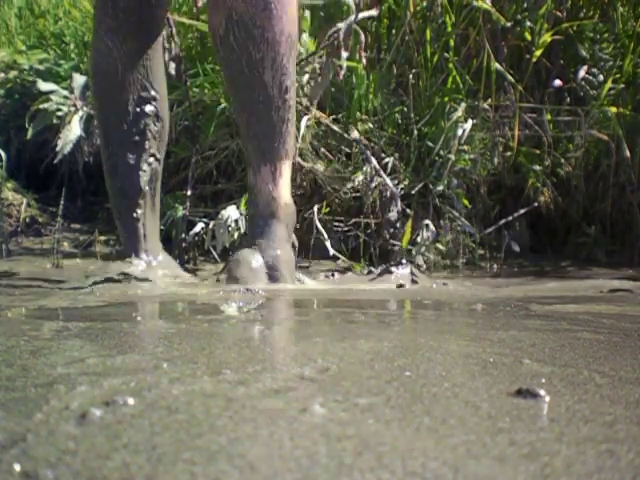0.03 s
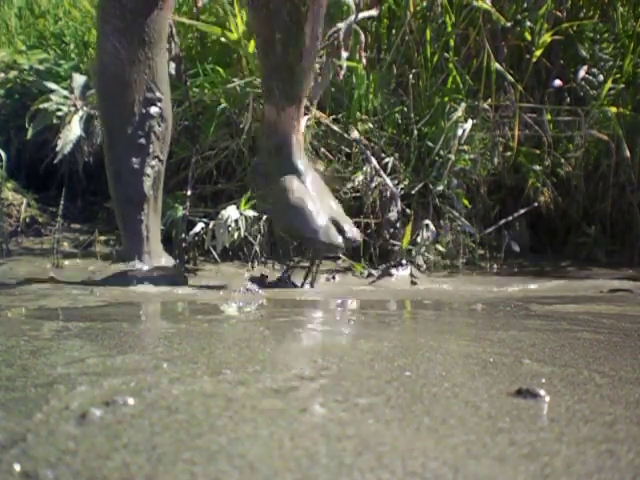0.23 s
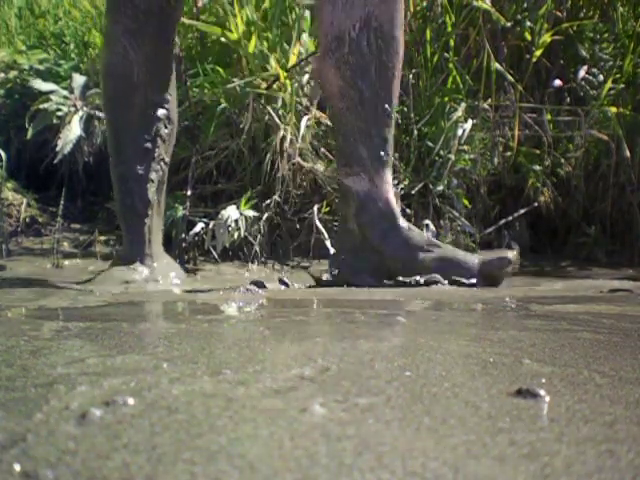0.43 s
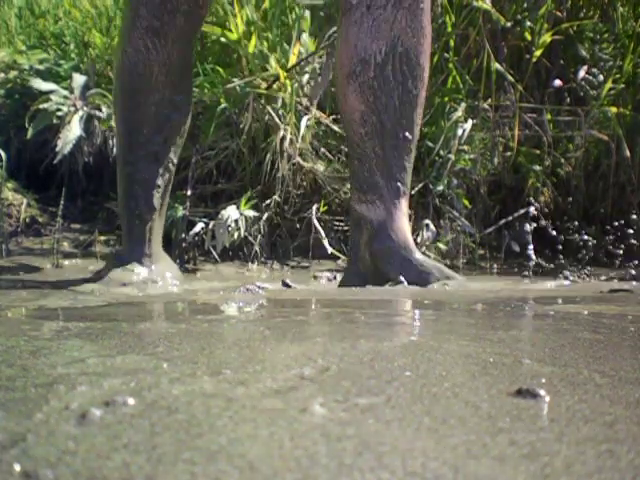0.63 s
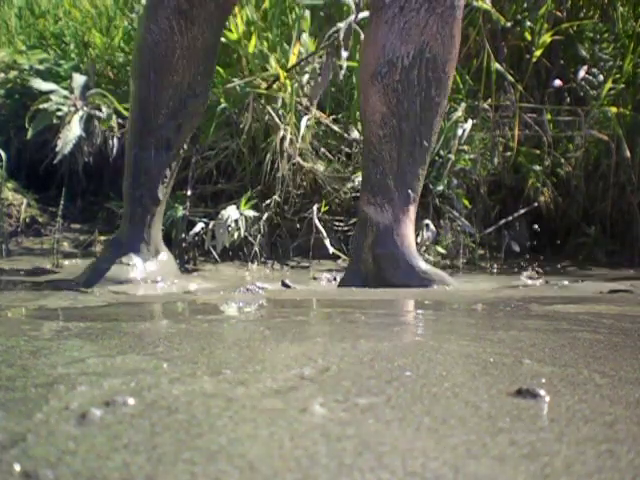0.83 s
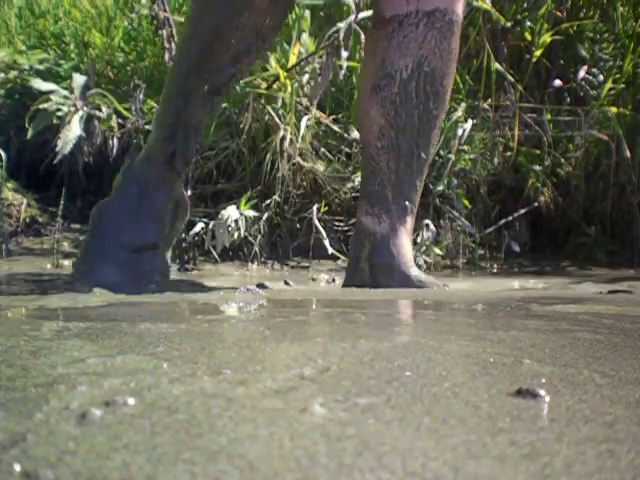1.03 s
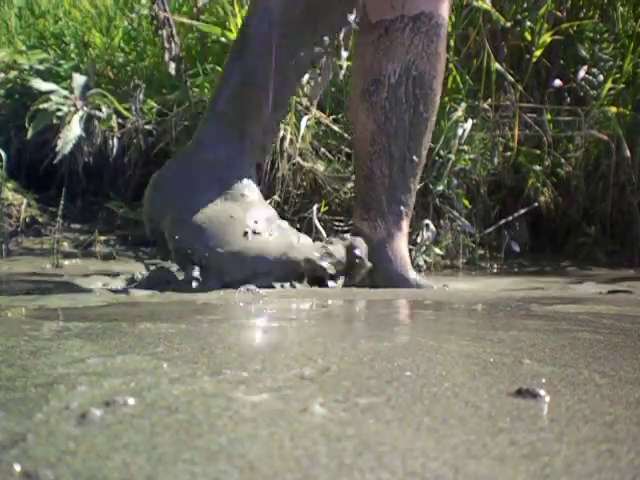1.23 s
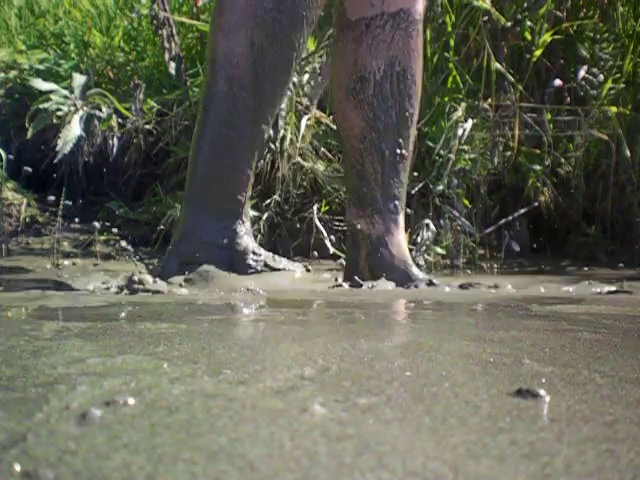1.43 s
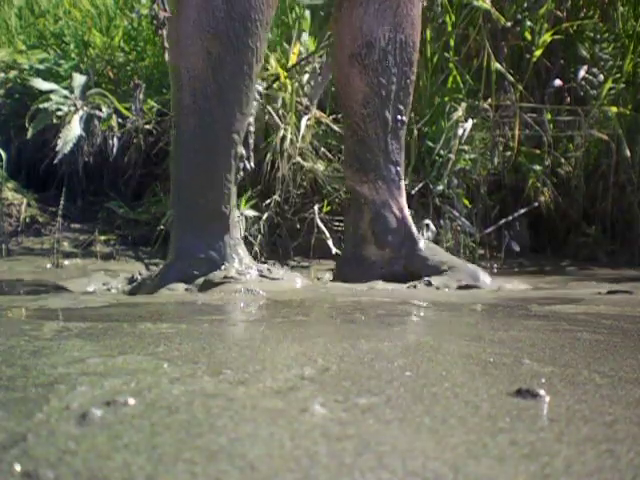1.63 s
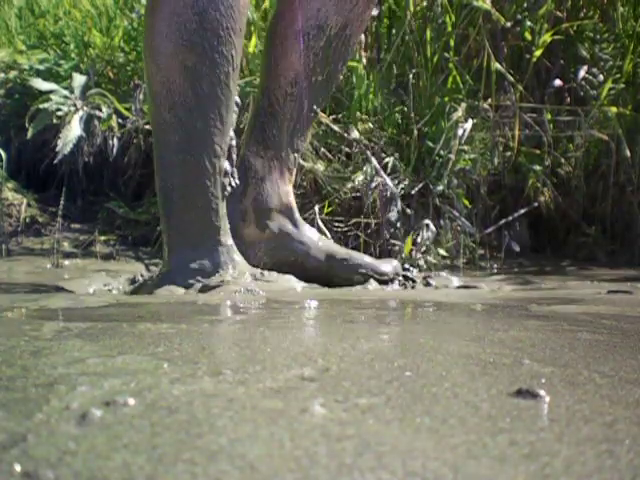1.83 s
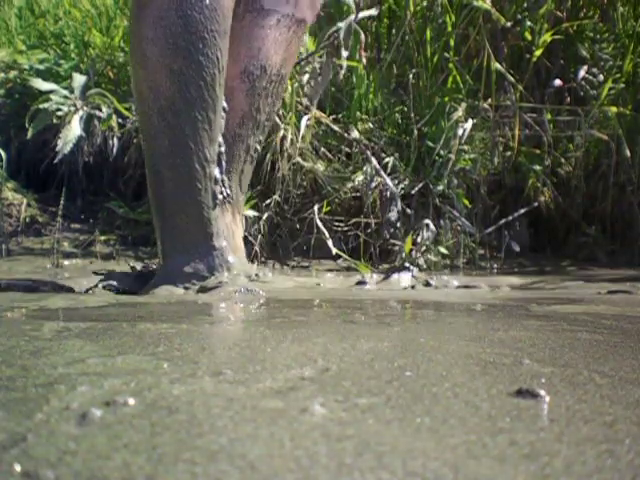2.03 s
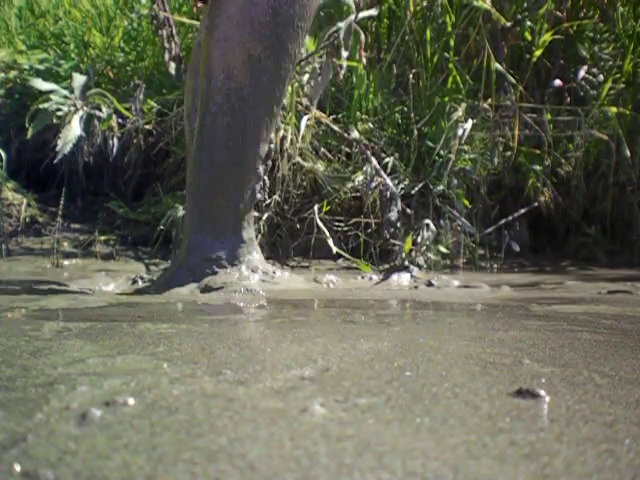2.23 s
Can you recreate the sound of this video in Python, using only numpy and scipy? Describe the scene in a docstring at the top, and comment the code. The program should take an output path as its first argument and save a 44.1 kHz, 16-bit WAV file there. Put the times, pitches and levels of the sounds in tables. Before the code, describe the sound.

Bare feet squelch in wet mud outdoors: one foot pulls free and lands with short sucking pops, then the other follows. A low motor hum and hiss continue behind, through a dull-sounding microphone.

```python
"""Bare feet in wet mud

Outdoors, a foot pulls free and lands, then the other follows. Air pockets pop and ring, rising in pitch;
air sucked through gaps smacks; wet films snap; fine bubbles squelch. Behind: a low motor hum and hiss.
The microphone is dull and the loudest pops overload it."""
import sys
import numpy as np
from scipy import signal
from scipy.fft import rfft, irfft
from scipy.io import wavfile

SR = 44100
rng = np.random.default_rng(int(sys.argv[2]) if len(sys.argv) > 2 else 0)


def dump_mix(stems):
    """Bounce the given channels to the path in sys.argv[1] as a 16-bit WAV at rate SR."""
    frames = np.atleast_2d(stems).T  # one column per channel
    limited = np.clip(frames, -1, 1)  # hard clip at full scale
    pcm = np.round(limited * 32767).astype(np.int16)
    wavfile.write(sys.argv[1], SR, pcm)


N = 105840
T = np.arange(N) / SR
BINS_HZ = np.maximum(np.arange(N // 2 + 1) * SR / N, 1)

# motor fundamental: time_s, pitch_hz
MOTOR_PITCH = [(0, 63.66), (.3, 62.66), (.95, 63.3), (1.3, 64.43), (2.4, 63.76)]
# steady motor partials: harmonic, rms_db
MOTOR_PARTIALS = [(1, -48.5), (2, -55.5), (3, -58.5), (4, -49), (8, -45), (10, -46.5), (13, -47.5)]
# swelling motor partial: time_s, rms_db
MOTOR_SWELL = [(0, -37), (.42, -40.5), (.7, -66.5), (.9, -40), (1.22, -38.5), (1.4, -44.5), (2.4, -47)]
# hiss spectrum: freq_hz, gain_db
HISS_SPECTRUM = [(20, -21.5), (45, -11), (70, -4.5), (100, -5.5), (170, -3), (280, -3.5), (410, -1.5),
                 (520, -0.5), (720, -2), (1150, -1), (1550, -3), (2300, -11.5), (3200, -10), (3900, -22.5),
                 (4400, -20)]
# air pockets popping: start_s, level_db, pitch_hz, t60_s, rise_fraction
POCKET_POPS = [(0.1797, -10.5, 893, 0.033, 0.17), (0.2095, -6, 397, 0.065, 0.086),
               (0.2226, -8.5, 361, 0.036, 0.04), (0.2368, -7.5, 302, 0.028, 0.26),
               (0.309, -11.5, 1116, 0.02, .1), (.3210, -7.5, 1240, 0.012, 0.12),
               (.3818, -11, 870, 0.014, 0.097), (.5900, -4, 1786, 0.01, 0.33), (0.6181, -1, 1600, .009, .1),
               (0.6328, -13.5, 3940, 0.01, 0.028), (0.6368, -8, 3050, 0.0069, .1),
               (0.6362, -5.5, 920, 0.016, 0.17), (0.683, -17, 1127, 0.055, .2),
               (1.351, -6.5, 1485, 0.0094, 0.22), (1.4741, -2.5, 1480, .014, 0.17),
               (1.4875, -3, 1260, 0.016, 0.14), (1.4880, -6.5, 3560, 0.017, 0.071),
               (1.886, -6.5, 1273, 0.014, 0.13), (1.8940, 0, 1130, 0.0099, 0.061),
               (1.9022, -3, 1123, 0.018, 0.12), (1.9099, -7.5, 3074, 0.0097, 0.11),
               (1.917, -12, 2930, 0.012, 0.059), (1.9295, -7, 1790, 0.0068, 0.11),
               (1.935, -17.5, 3100, 0.018, 0.072), (1.971, -15.5, 1696, 0.027, 0.14),
               (2.0340, -7.5, 1620, 0.012, 0.11), (2.0448, -16, 2860, 0.018, .05),
               (2.0727, -3.5, 355, 0.041, 0.45), (2.108, -6, 3460, 0.012, 0.46),
               (2.2660, -12.5, 1100, 0.017, 0.094)]
# air sucked through gaps: start_s, length_s, level_db, start_hz, end_hz
GAP_SUCKS = [(.2030, 0.0037, 0, 1077, 1176), (0.2102, 0.005, -1, 1093, 1630), (.2210, .0026, -2, 900, 1050),
             (0.2242, 0.0044, -2.5, 1320, 1415), (0.231, 0.0055, 1, 1294, 1392),
             (0.2367, .009, -18, 1394, 1440), (0.255, 0.0036, -16, 1013, 1630),
             (0.6197, .0075, -2.5, 895, 958), (0.6272, 0.0053, -13.5, 1114, 1740),
             (1.481, .007, -16.5, 865, 873), (1.493, .007, -12.5, 1033, 1400),
             (1.921, 0.0041, -17, 1610, 1900), (2.0928, 0.0037, -12.5, 914, 1760),
             (2.111, 0.01, -18, 1256, 1430), (2.1795, 0.0059, -14, 1914, 1860)]
# wet films snapping: start_s, click_db, rustle_db
FILM_SNAPS = [(0.2044, 1, -6), (0.2074, 17, -3.5), (0.222, 2, -16), (0.6253, 4.5, -12.5),
              (0.6336, 3, -11.5), (1.4622, -1.5, -20), (1.4881, -7, -19), (1.8784, 12.5, -25),
              (2.0725, 14, -29), (2.1066, 1, -15.5), (2.2673, 0, -15)]
# film rustle spectrum: freq_hz, gain_db
RUSTLE_SPECTRUM = [(100, -33), (500, -6), (1300, 4), (2300, 0), (3400, -6), (4400, -3), (6000, -24.5)]
# mud squeezed or torn: centre_s, sigma_s, bubbles_db, fizz_db
SQUEEZES = [(0.206, 0.0043, -12.5, -27.5), (.231, 0.0073, -9, -21.5), (0.243, 0.015, -26, -42.5),
            (0.33, 0.012, -33, -40), (0.44, 0.042, -35, -39), (0.63, 0.0098, -22, -33.5),
            (0.683, 0.026, -29, -39.5), (1.353, 0.0086, -29.5, -30.5), (1.441, 0.0088, -29.5, -28.5),
            (1.465, 0.0046, -45, -20), (1.499, 0.01, -27, -20.5), (1.536, 0.039, -38.5, -35),
            (1.628, 0.01, -29.5, -35.5), (1.902, 0.031, -25, -42), (2.046, 0.018, -29.5, -31.5),
            (2.076, 0.0054, -27, -32.5), (2.103, 0.013, -19.5, -29), (2.195, 0.019, -26, -30.5),
            (2.268, 0.0046, -41, -34)]
# low bubble EQ: freq_hz, gain_db
BUBBLE_EQ = [(150, -19.5), (300, -24), (600, -3), (1000, -1), (1400, 2), (1800, -0.5), (2400, -14)]
# fine fizz EQ: freq_hz, gain_db
FIZZ_EQ = [(1800, -1), (2400, -5.5), (3200, -4), (4000, -3), (4600, 2.5)]
# EQ after the overload: freq_hz, gain_db
OUTPUT_EQ = [(4000, -0.5), (4600, -14.5), (7000, -7), (12000, -6)]


def from_db(db):
    """Decibels to gain."""
    return 10 ** (np.asarray(db) / 20)


def unit_rms(x):
    """Scale to rms 1."""
    return x / np.sqrt(np.mean(x ** 2) + 1e-20)


def equalise(x, curve):
    """Apply a gain curve, interpolated in log frequency."""
    hz, db = np.transpose(curve)
    return irfft(rfft(x) * from_db(np.interp(np.log(BINS_HZ), np.log(hz), db)), N)


def noise(spectrum):
    """Shaped noise, rms 1."""
    return unit_rms(equalise(rng.standard_normal(N), spectrum))


def drift(rate_hz):
    """Random wander, rms 1."""
    return unit_rms(np.interp(T * rate_hz, np.arange(1000), rng.standard_normal(1000)))


def low_cut(x, hz):
    """Second-order high-pass."""
    return signal.sosfilt(signal.butter(2, hz, "high", fs=SR, output="sos"), x)


def add(out, start_s, sound):
    """Mix a sound in at start_s."""
    start = int(start_s * SR)
    out[start:start + len(sound)] += sound[:N - start]


def motor_hum(wander_fraction=0.002, flicker_db=0.68, swell_harmonic=6):
    """Harmonics follow the motor's slowly changing speed; one swells and fades."""
    pitch_hz = np.interp(T, *np.transpose(MOTOR_PITCH)) * (1 + wander_fraction * drift(rate_hz=8))
    phase = 2 * np.pi * np.cumsum(pitch_hz) / SR
    hum = from_db(np.interp(T, *np.transpose(MOTOR_SWELL))) * np.sin(swell_harmonic * phase)
    for harmonic, rms_db in MOTOR_PARTIALS:
        gain = from_db(rms_db + flicker_db * drift(rate_hz=20))
        hum += gain * np.sin(harmonic * phase + rng.uniform(0, 2 * np.pi))
    return np.sqrt(2) * hum


def hiss(rms_db=-29, flicker_db=0.86):
    """Steady noise with a slight level flicker."""
    return from_db(rms_db + flicker_db * drift(rate_hz=40.14)) * noise(HISS_SPECTRUM)


def cavity_tone(pitch_hz, wobble_fraction=0.031, wobble_hz=290, mode_ratio=2.2, mode_db=-24):
    """Air rings in a cavity, with a weak second mode; soft walls make the pitch waver."""
    wobble = np.interp(T[:len(pitch_hz)] * wobble_hz, np.arange(200), rng.standard_normal(200))
    phase = 2 * np.pi * np.cumsum(pitch_hz * (1 + wobble_fraction * wobble)) / SR
    return np.sin(phase) + from_db(mode_db) * np.sin(mode_ratio * phase)


def pocket_pops(attack_s=0.00067, rise_s=0.012):
    """Each pocket opens and rings briefly, rising in pitch as its mouth widens."""
    out, t = np.zeros(N), T[:SR // 10]
    for start_s, level_db, pitch_hz, t60_s, rise_fraction in POCKET_POPS:
        envelope = (1 - np.exp(-t / attack_s)) * from_db(-60 * t / t60_s)
        glide_hz = pitch_hz * (1 + rise_fraction * (1 - np.exp(-t / rise_s)))
        add(out, start_s, from_db(level_db) * envelope * cavity_tone(glide_hz))
    return out


def gap_sucks(attack_s=0.00033, release_s=0.001):
    """Air drawn through a gap drives a gliding cavity tone until the mud shuts it off."""
    out, t = np.zeros(N), T[:SR // 20]
    for start_s, length_s, level_db, start_hz, end_hz in GAP_SUCKS:
        envelope = (1 - np.exp(-t / attack_s)) * np.exp(-np.maximum(t - length_s, 0) / release_s)
        glide_hz = np.interp(t, [0, length_s], [start_hz, end_hz])
        add(out, start_s, from_db(level_db) * envelope * cavity_tone(glide_hz))
    return out


def film_snaps(decay_s=0.0014, click_cutoff_hz=1900):
    """A breaking mud film gives a dull suction click and a brief rustle."""
    envelope, clicks, t = np.zeros(N), np.zeros(N), T[:SR // 20]
    for start_s, click_db, rustle_db in FILM_SNAPS:
        add(envelope, start_s, from_db(rustle_db) * np.exp(-t / decay_s))
        add(clicks, start_s, -from_db([click_db]))
    dull_clicks = signal.sosfilt(signal.butter(2, click_cutoff_hz, fs=SR, output="sos"), clicks)
    return dull_clicks + envelope * noise(RUSTLE_SPECTRUM)


def bubble_ring(clicks, pitch_hz, t60_cycles=13):
    """Each click rings a bubble as a damped sine."""
    radius = from_db(-60 * pitch_hz / (t60_cycles * SR))
    angle = 2 * np.pi * pitch_hz / SR
    return signal.lfilter([0, np.sin(angle)], [1, -2 * radius * np.cos(angle), radius ** 2], clicks + 1e-18)


def bubble_cloud(low_hz, high_hz, eq, bursts_per_s, pitches, spread_db=2.5):
    """Tiny bubbles of random strength and pitch burst at random; rms 1."""
    strengths = from_db(spread_db * np.minimum(rng.exponential(1, N), 3)) * rng.choice([-1, 1], N)
    clicks = strengths * (rng.random(N) < bursts_per_s / SR)
    pitch_index = rng.integers(0, pitches, N)
    rings = np.zeros(N)
    for k, pitch_hz in enumerate(np.geomspace(low_hz, high_hz, pitches)):
        rings += pitch_hz * bubble_ring(clicks * (pitch_index == k), pitch_hz)
    return unit_rms(equalise(rings, eq))


def squelches():
    """Each squeeze swells and fades, driving low bubbles and fine fizz."""
    bubble_gain, fizz_gain = np.zeros(N), np.zeros(N)
    for centre_s, sigma_s, bubbles_db, fizz_db in SQUEEZES:
        swell = np.exp(-0.5 * ((T - centre_s) / sigma_s) ** 2)
        bubble_gain += from_db(bubbles_db) * swell
        fizz_gain += from_db(fizz_db) * swell
    bubbles = bubble_cloud(low_hz=210, high_hz=2227, eq=BUBBLE_EQ, bursts_per_s=2200, pitches=24)
    fizz = bubble_cloud(low_hz=2100, high_hz=4300, eq=FIZZ_EQ, bursts_per_s=1300, pitches=12)
    return bubble_gain * bubbles + fizz_gain * fizz


def bank_scatter(x, level_db=-28, t60_s=0.56, delay_s=0.02):
    """The bank and grass scatter sound into a faint, short tail."""
    t = T[:SR // 2]
    tail = rng.standard_normal(len(t)) * from_db(-60 * t / t60_s) * (t > delay_s)
    return from_db(level_db) * signal.fftconvolve(x, tail / np.linalg.norm(tail))[:N]


def scene():
    """Mud sounds and their scatter over hum and hiss; mono."""
    mud = pocket_pops() + gap_sucks() + film_snaps() + squelches()
    mud = low_cut(low_cut(mud, hz=200), hz=200)  # sources too small to radiate bass
    return (mud + bank_scatter(mud) + motor_hum() + hiss())[None]


def record(dry):
    """A narrow-band microphone overloads on the loudest pops; the treble is then softened and cut."""
    mic_top_hz, mic_edge_hz, cutoff_hz = 4180, 110, 16800
    ceiling, knee_power = 0.7, 32
    passband = 0.5 * (1 - np.tanh((BINS_HZ - mic_top_hz) / (2 * mic_edge_hz)))
    dull = irfft(rfft(low_cut(dry, hz=40)) * passband, N)
    clipped = dull / (1 + np.abs(dull / ceiling) ** knee_power) ** (1 / knee_power)
    softened = equalise(clipped, OUTPUT_EQ)
    return signal.sosfilt(signal.cheby2(12, 70, cutoff_hz, fs=SR, output="sos"), softened)


dry = scene()
out = record(dry)
dump_mix(out)
```